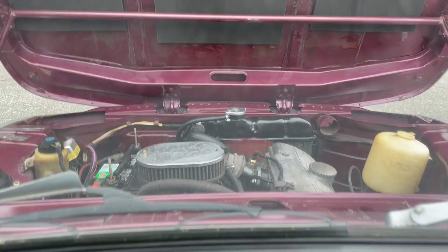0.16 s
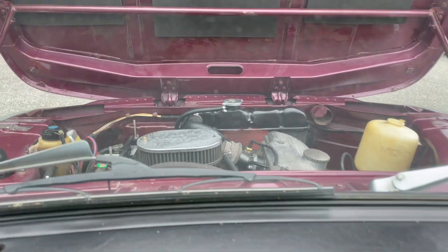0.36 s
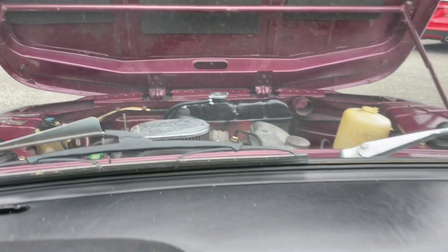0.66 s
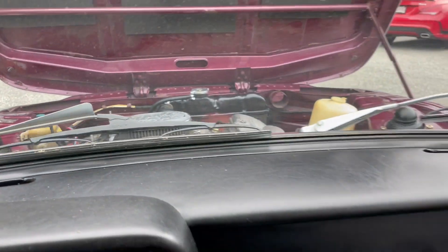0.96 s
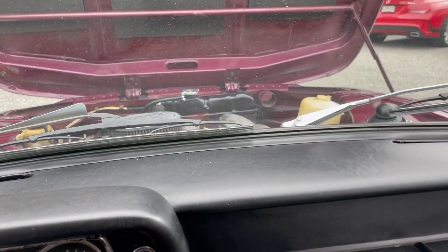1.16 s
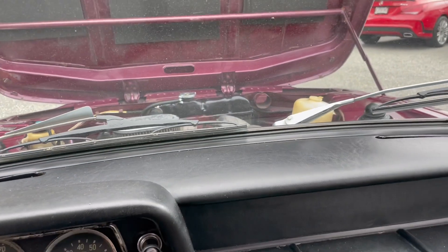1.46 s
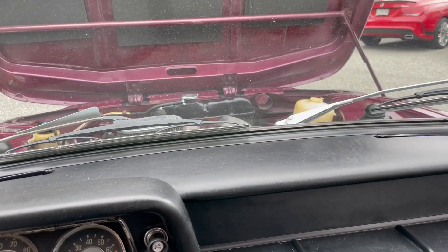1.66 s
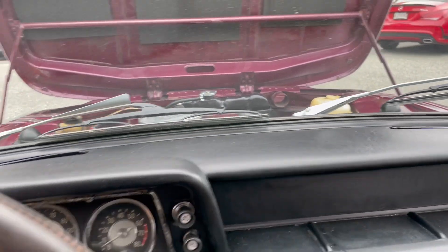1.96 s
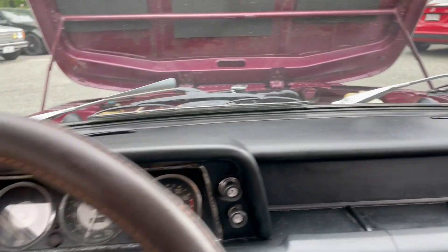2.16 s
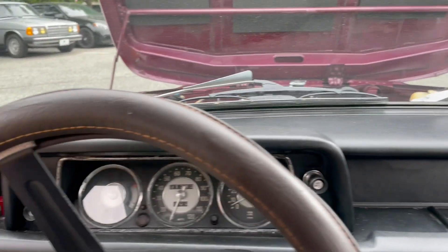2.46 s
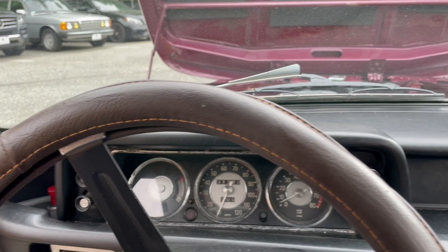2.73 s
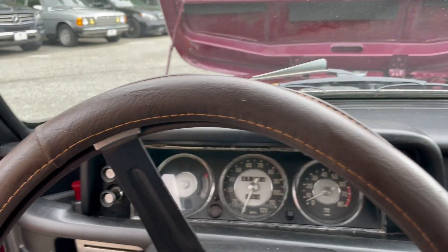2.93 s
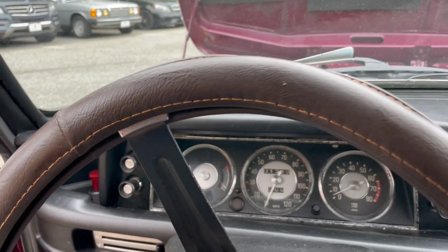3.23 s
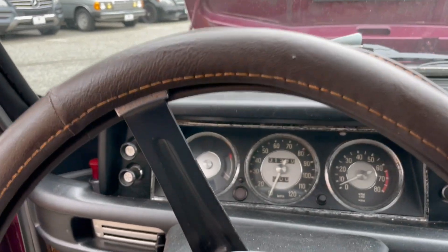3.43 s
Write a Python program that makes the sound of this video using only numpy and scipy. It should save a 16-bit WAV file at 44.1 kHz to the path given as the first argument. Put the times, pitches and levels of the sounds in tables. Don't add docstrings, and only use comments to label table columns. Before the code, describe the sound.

Uneven old-car engine idling close by, deep exhaust throb under soft mechanical ticking and hiss.

```python
import sys
import numpy as np
from scipy import signal
from scipy.fft import rfft, irfft, next_fast_len
from scipy.io import wavfile
from scipy.ndimage import uniform_filter1d

SR = 44100
rng = np.random.default_rng(int(sys.argv[2]) if len(sys.argv) > 2 else 0)


def generate_wav(sig):
    pcm = np.round(np.clip(np.atleast_2d(sig).T, -1, 1) * 32767).astype(np.int16)
    wavfile.write(sys.argv[1], SR, pcm)


def ratio_of_db(decibels):
    return 10 ** (np.asarray(decibels, float) / 20)


N = 158319
T = np.arange(N) / SR
RUN_IN = 16384
FAST = next_fast_len(N + 4096)


def level(x, db):
    return x * ratio_of_db(db) / np.sqrt(np.mean(x ** 2))


def over_hz(table, hz):
    table = np.array(table)
    return np.interp(np.log(np.maximum(hz, 1)), np.log(table[:, 0]), table[:, 1])


def over_time(table, axis):
    table = np.array(table)
    return np.interp(T, table[:, 0], table[:, axis])


def walk(rate_hz):
    hold = int(SR / rate_hz)
    steps = np.repeat(rng.standard_normal(N // hold + 1), hold)
    return 1.39 * uniform_filter1d(uniform_filter1d(steps, hold), hold)[:N]


def sine(phase):
    return np.sqrt(2) * np.sin(phase)


def bump(age_s, rise_s, fall_s):
    return np.exp(-.5 * (age_s / np.where(age_s < 0, rise_s, fall_s)) ** 2)


def ring(x, hz, width_hz):
    b, a = signal.iirpeak(hz, hz / width_hz, fs=SR)
    return signal.lfilter(b, a, np.r_[x[-RUN_IN:], x])[RUN_IN:]


# (time [s], seventh multiple of the firing rate [Hz])
SPEED = [(0.0, 176.3), (0.38, 180.3), (0.5, 176.6), (0.93, 177.7), (1.3, 172.7), (1.52, 178.8),
         (1.86, 176.5), (2.0, 180.1), (2.22, 177.1), (2.56, 176.9), (2.83, 181.1), (3.14, 178.3),
         (3.52, 178.6), (3.59, 177.0)]


def crank():
    return np.cumsum(over_time(SPEED, axis=1) / 7) / SR


# (time [s], retreat [0-1], hiss [dB], engine bay [dB])
PHONE = [
    (0, 0.5, 3, 2.5),
    (.3, 0, 3, 1),
    (.6, 0, 1.5, 1),
    (1.2, 0, 0, -1),
    (1.9, 0, 0.5, -2.5),
    (2.3, 0.3, 2.5, -2.5),
    (2.8, 1, 1.5, -1),
    (3.1, 0.88, 3.5, -2),
    (3.59, 1, 9, -0.5),
]


def phone():
    return [over_time(PHONE, axis) for axis in (1, 2, 3)]


# (time [s], level [dB], pitch [Hz])
BOOM = [(0, -18, 74.32), (.27, -22.5, 75.31), (.4, -23, 75.97), (.54, -20.5, 75.58), (.7, -23, 75.69),
        (.88, -24.5, 75.68), (1.05, -22, 75.66), (1.22, -23, 75.1), (1.38, -18.5, 74.53),
        (1.52, -23.5, 75.12), (1.7, -25.5, 75.94), (1.87, -23.5, 75.5), (2.2, -29.5, 76.02),
        (2.44, -22, 74.9), (2.72, -25, 75.21), (2.97, -28.5, 76.36), (3.23, -24.5, 75.77),
        (3.59, -29, 75.65)]
# (time [s], depth [dB], length [s])
STUMBLES = [(0.162, 4.5, 0.052), (0.333, 3.5, 0.016), (0.456, 10.5, 0.029), (0.63, 4.5, 0.027),
            (0.964, 15.5, 0.022), (1.108, 3.5, 0.024), (1.602, 12.5, 0.036), (1.755, 2, .03),
            (2.095, 14.5, 0.019), (2.355, 4.5, 0.039), (2.569, 8, 0.06), (2.894, 30, 0.022),
            (3.069, 7, 0.053), (3.332, 11, 0.017), (3.527, 7, 0.024)]


def boom(turns):
    hz = over_time(BOOM, axis=2) * (1 + .004 * walk(25.04))
    dip_db = sum(depth_db * bump(T - s, 1.15 * length_s, .85 * length_s)
                 for s, depth_db, length_s in STUMBLES)
    firing_db = .5 * np.cos(2 * np.pi * turns)
    db = over_time(BOOM, axis=1) - dip_db + .5 * walk(25.03) + firing_db
    return ratio_of_db(db) * sine(2 * np.pi * np.cumsum(hz) / SR + 4)


def firings(turns, scatter_db, jitter, pattern_db):
    count = np.arange(1, int(turns[-1]))
    early_late, strength = rng.standard_normal((2, len(count)))
    at = np.interp(count + jitter * early_late, turns, np.arange(N)).astype(int)
    out = np.zeros(N)
    out[at] = ratio_of_db(scatter_db * strength + np.array(pattern_db)[count % len(pattern_db)])
    return out


# (centre [Hz], width [Hz], level [dB])
PIPE = [(52.5, 17, -45), (62.3, 7.1, -45), (101.7, 8.5, -43.5), (127.1, 14, -44), (153, 11, -51.5),
        (205.7, 9.6, -57), (253.4, 14, -62), (332.8, 9.7, -68)]


def pipe(turns):
    _, _, bay_db = phone()
    clicks = firings(turns, scatter_db=1.5, jitter=.02, pattern_db=[0, -2, 1, -3])
    out = np.zeros(N)
    for k, (hz, width_hz, db) in enumerate(PIPE):
        rung = ring(ring(clicks, hz, width_hz), hz, 2 * width_hz)
        out += (-1) ** k * level(rung, db)
    return out * ratio_of_db(.5 * bay_db)


# (time [s], level [dB], pitch [Hz])
THUMPS = [(0.19, -34.5, 50.9), (0.373, -33, 50.2), (0.64, -30, 51), (0.748, -49, 50.5), (0.849, -27.5, 50),
          (0.993, -36.5, 50), (1.096, -34, 48), (1.255, -37.5, 50.6), (1.433, -30.3, 48.4),
          (1.572, -35.5, 49.2), (1.692, -31.5, 47.6), (1.933, -28.5, 48.7), (2.065, -32.5, 48.2),
          (2.28, -33, 49), (2.416, -28, 46.7), (2.614, -30, 49.2), (2.787, -27.5, 50), (2.928, -28.5, 50.2),
          (3.076, -31.5, 49.6), (3.273, -25, 50), (3.405, -32, 49.6), (3.567, -31, 53.6)]


def thumps():
    return sum(ratio_of_db(db) * bump(T - s, rise_s=.025, fall_s=.037) * sine(2 * np.pi * hz * (T - s))
               for s, db, hz in THUMPS)


# (multiple of firing rate [ratio], level [dB rms])
BLOCK = [(1, -36.5), (1.5, -56), (2.5, -48.5), (3.5, -43.5), (4, -42.5), (4.5, -45), (5, -44.5),
         (5.25, -49), (6, -53.5), (7, -44.5), (8, -57), (10, -58), (11, -60.5), (14, -64)]


def block(turns):
    _, _, bay_db = phone()
    out = np.zeros(N)
    for order, db in BLOCK:
        wander_db = 2 * min(order / 4, 1) * walk(6.17)
        line = sine(2 * np.pi * order * turns + 6 * rng.random())
        out += ratio_of_db(db + wander_db + order / 9 * bay_db) * line
    return out


# (time [s], pitch [Hz], level [dB])
TICKS = [
    (.08, 9250, -56),
    (.685, 9360, -57.5),
    (2.1, 8900, -57.5),
    (2.58, 8900, -58),
    (2.82, 10500, -59),
    (3.2, 9330, -58),
    (3.28, 10750, -69),
]


def valves(turns):
    _, hiss_db, _ = phone()
    gate = np.exp(-(turns % 1) / .2) * ratio_of_db(3 * walk(23) + hiss_db)
    out = level(gate * ring(rng.standard_normal(N), hz=9600, width_hz=2500), -76.5)
    t60_s = .05
    for s, hz, db in TICKS:
        fade = np.where(T > s, ratio_of_db(db - 60 * np.maximum(T - s, 0) / t60_s), 0)
        out = out + fade * level(ring(rng.standard_normal(N), hz, 500), 0)
    return out


# (time [s], pitch [Hz], level [dB rms])
PANEL_RINGS = [(0.079, 4570, -74), (0.291, 1010, -61), (0.33, 5555, -74), (0.34, 5792, -77), (0.35, 1990, -68),
               (0.39, 6240, -76), (0.44, 2080, -67), (0.57, 1360, -60), (0.63, 4155, -72), (0.64, 3180, -76),
               (0.65, 4629, -78), (0.88, 5540, -75), (1.04, 1436, -55), (1.37, 4155, -73), (1.38, 2294, -63.5),
               (1.46, 977, -59), (1.5, 2290, -65), (1.57, 5512, -78), (1.57, 5650, -73), (1.72, 4330, -77),
               (1.76, 3600, -72), (1.78, 4155, -73), (2.12, 4155, -73), (2.22, 5350, -75), (2.28, 1000, -51),
               (2.51, 4150, -69), (2.531, 990, -50), (2.53, 5534, -70), (2.66, 5878, -77), (2.802, 1010, -47),
               (2.8, 1430, -55), (2.81, 473, -46), (2.83, 4220, -74), (2.85, 5630, -70), (2.87, 4586, -74),
               (2.88, 1050, -59), (3.1, 4155, -71), (3.11, 1340, -59), (3.12, 4700, -71), (3.199, 484, -49),
               (3.23, 1440, -59), (3.33, 5760, -74), (3.35, 2030, -62), (3.42, 1390, -66), (3.42, 3660, -68),
               (0.091, 361, -47), (.28, 358, -50), (0.429, 391, -49), (.57, 350, -46.5), (0.781, 368, -53),
          (1.05, 400, -52), (1.3, 201, -44), (1.55, 356, -53), (2.41, 480, -50), (2.73, 390, -47.5),
          (2.85, 200, -42), (3.371, 252, -51)]


def panels():
    out = np.zeros(N)
    for s, hz, db in PANEL_RINGS:
        near = slice(max(int((s - .1) * SR), 0), int((s + .15) * SR))
        age_s = T[near] - s
        out[near] += ratio_of_db(db) * bump(age_s, rise_s=.015, fall_s=.02) * sine(2 * np.pi * hz * age_s)
    return out


def breathing_db(turns):
    pulse_db = .4 * np.cos(2 * np.pi * turns) + .28 * np.cos(np.pi * turns) + .18 * np.cos(np.pi / 2 * turns)
    return .2 * walk(3.7) + pulse_db


# (frequency [Hz], density [dB per Hz])
RUSH = [(40, -6.5), (200, -12.5), (620, -26.5), (1500, -30), (3000, -41.5), (5000, -48), (9500, -50),
        (13000, -57)]


def rush(swell_db):
    retreat, hiss_db, bay_db = phone()
    hz = np.fft.rfftfreq(FAST, 1 / SR)
    white = rfft(rng.standard_normal((3, FAST))) * ratio_of_db(over_hz(RUSH, hz))
    octave = np.log2(np.maximum(hz, 1) / 22)
    top_db = hiss_db + .7 * walk(11)
    out = 0
    for step in np.arange(0, 10.3, .75):
        slot = np.cos(np.pi / 2 * np.clip((octave - step) / .75, -1, 1)) ** 2
        centre_hz = 22 * 2 ** step
        db = swell_db + .9 * walk(10)
        if 150 < centre_hz < 700:
            db = db + bay_db
        if 400 < centre_hz < 3500:
            db = db + 1.5 * retreat
        if 3500 <= centre_hz < 6000:
            db = db + .87 * hiss_db + retreat
        if centre_hz >= 6000:
            db = db + top_db
        out = out + ratio_of_db(db) * irfft(white * slot, FAST)[:, :N]
    return level(out, -41)


def hollow(hz, width_hz):
    b, a = signal.iirpeak(hz, hz / width_hz, fs=SR)
    noise = rng.standard_normal((3, N))
    return level(signal.lfilter(np.convolve(b, b), np.convolve(a, a), noise), 0)


# (centre [Hz], width [Hz], level near windscreen [dB], level near seat [dB])
CABIN = [(357.2, 18, -59.5, -70.5), (471.6, 55, -61.5, -52), (611, 20, -69.5, -87), (742, 61, -65, -66.5),
         (1008, 115, -64, -55), (1419, 150, -62.5, -55), (2036, 120, -70, -63.5), (2326, 160, -80, -65.5),
         (2707, 130, -80, -73), (3170, 170, -77.5, -70), (4155, 90, -83.5, -79), (4640, 110, -85.5, -82.5),
         (5560, 300, -83, -77)]


def cabin(swell_db):
    retreat, _, bay_db = phone()
    out = 0
    for hz, width_hz, front_db, seat_db in CABIN:
        db = front_db + (seat_db - front_db) * retreat + 2 * swell_db + 1.2 * walk(18)
        if hz < 400:
            db = db + 2.2 * bay_db
        out = out + hollow(hz, width_hz) * ratio_of_db(db)
    return out


# (frequency [Hz], phase [rad])
LEAD = [(1290, 2.5), (1980, 5.9), (5680, 6.6), (6900, 3.4), (7600, 2.7), (9000, 1.75), (10300, .45),
        (11300, 0), (12300, -.9), (13300, -2.3), (14400, -3.14), (15700, -3.75)]
# (frequency [Hz], shared power [0-1])
ALIKE = [(60, .99), (250, .66), (600, .4), (1200, .35), (2200, .8), (4400, .4), (7000, .9), (11300, .98),
         (15500, .93)]
# (frequency [Hz], left minus right [dB])
TILT = [(80, -.6), (120, 1.6), (200, 2), (380, 2), (700, 3.8), (1290, 1.3), (2800, 2), (8000, -.3)]


def ports(shared, fields):
    hz = np.fft.rfftfreq(FAST, 1 / SR)
    alike = over_hz(ALIKE, hz)
    lead_rad = over_hz(LEAD, hz) * np.minimum(hz / LEAD[0][0], 1)
    out = []
    for side in (1, -1):
        own = fields[side] + .57 * np.roll(shared, side * 150)
        mix = np.sqrt(alike) * rfft(shared + fields[0], FAST) + np.sqrt(1 - alike) * rfft(own, FAST)
        lag = np.exp(.5j * side * lead_rad) * ratio_of_db(side * over_hz(TILT, hz) / 2)
        out.append(irfft(mix * lag, FAST)[:N])
    return np.array(out)


def scene():
    turns = crank()
    engine = boom(turns) + pipe(turns) + thumps() + block(turns) + valves(turns) + panels()
    swell_db = breathing_db(turns)
    return ports(engine, rush(swell_db) + cabin(swell_db))


def low_pass(x):
    return signal.sosfilt(signal.butter(12, 15710, fs=SR, output="sos"), x)


def record(dry):
    low_cut = signal.butter(3, 22, "high", fs=SR, output="sos")
    mix = signal.sosfiltfilt(low_cut, dry, padlen=RUN_IN)
    return low_pass(mix)


dry = scene()
out = record(dry)
generate_wav(out)
```